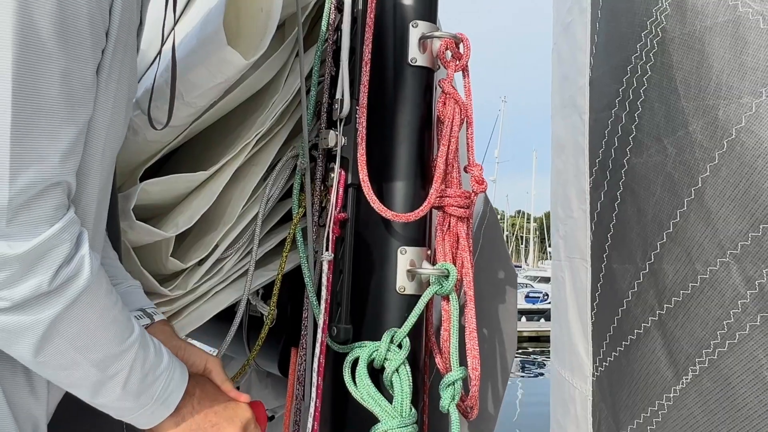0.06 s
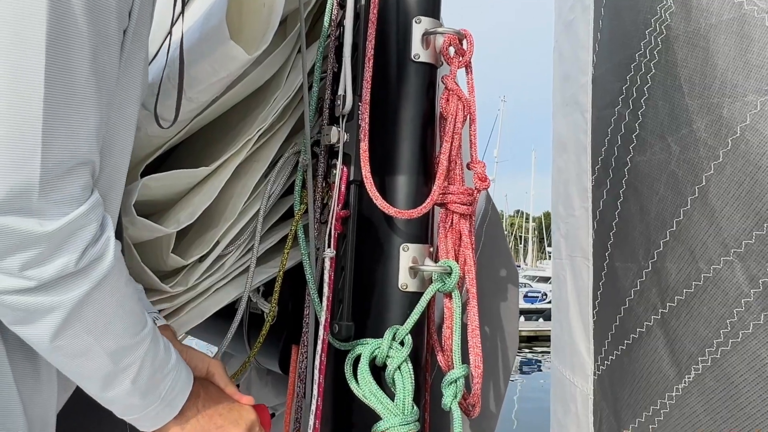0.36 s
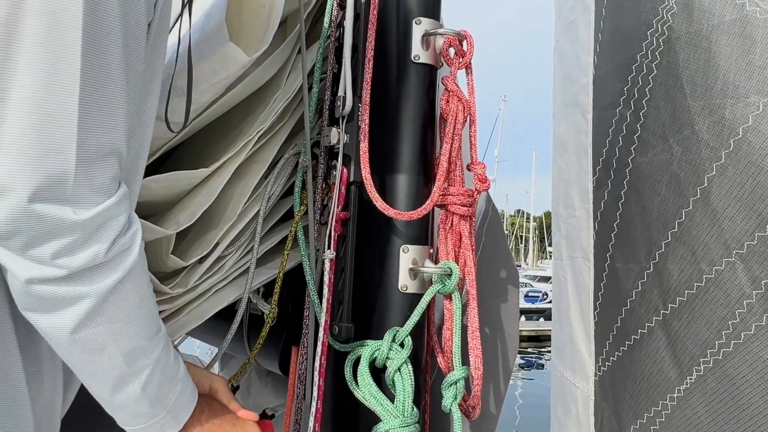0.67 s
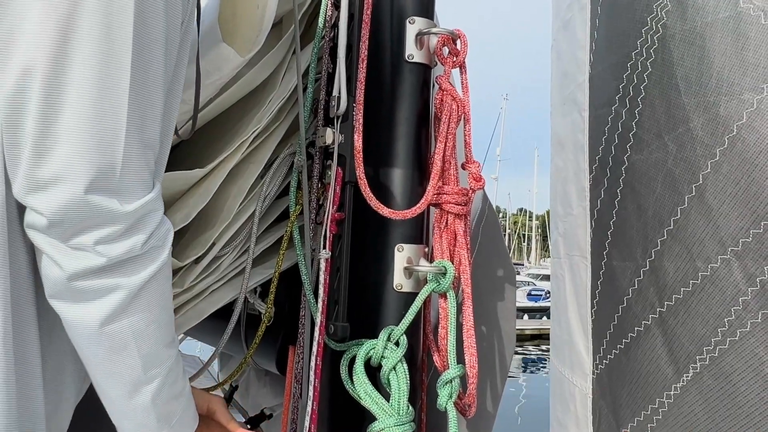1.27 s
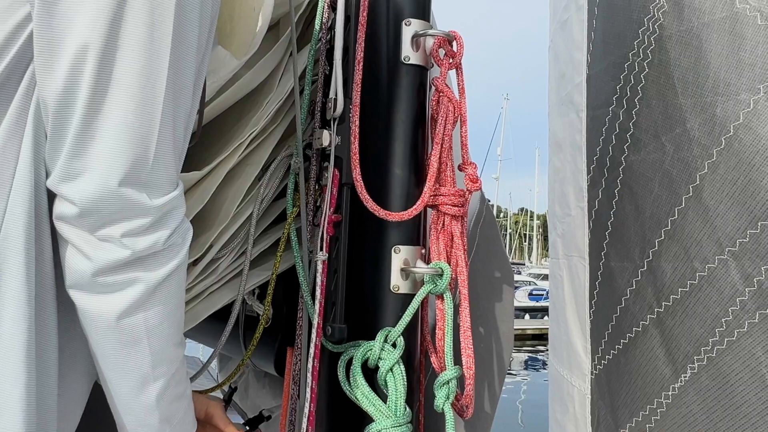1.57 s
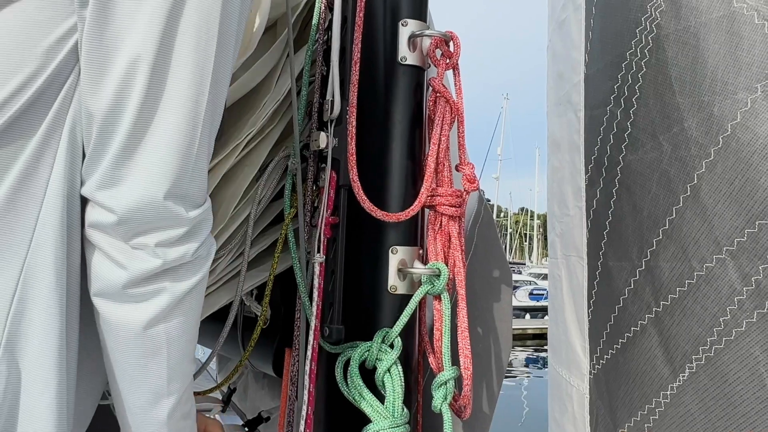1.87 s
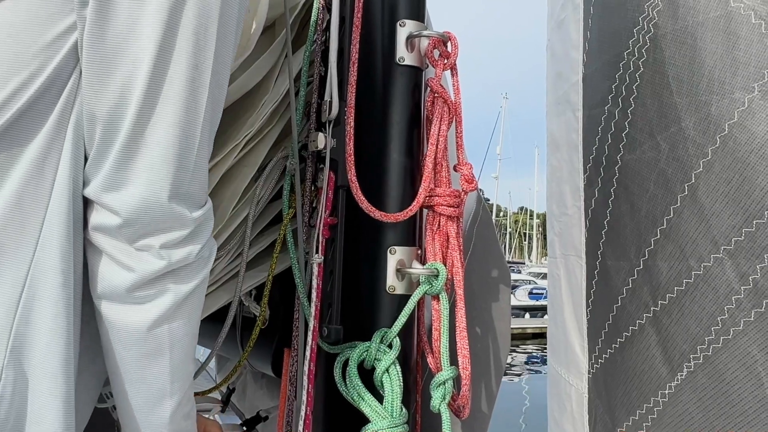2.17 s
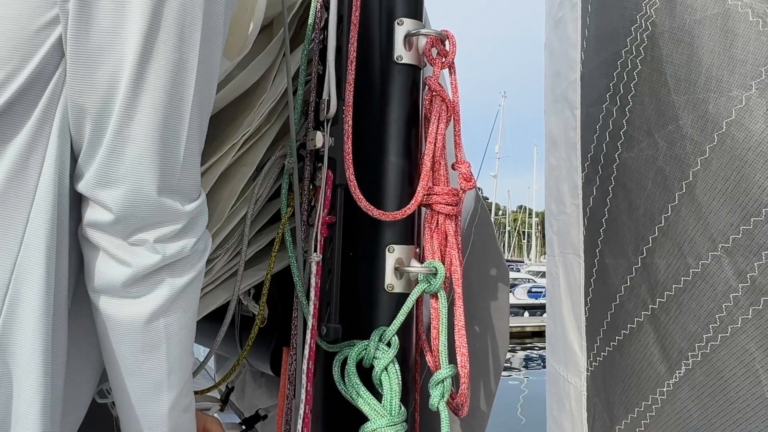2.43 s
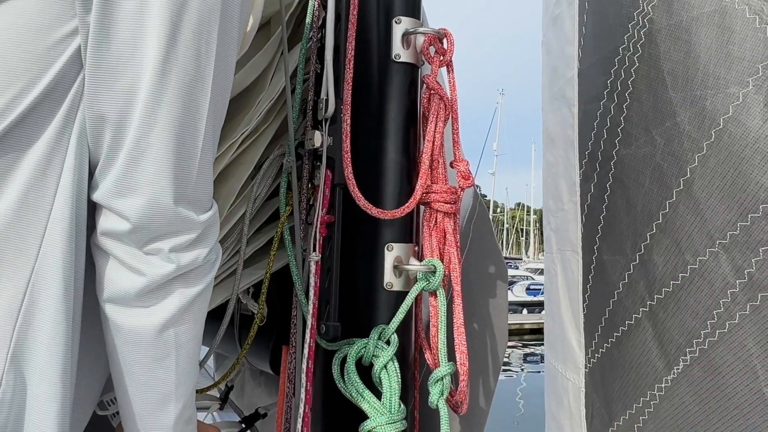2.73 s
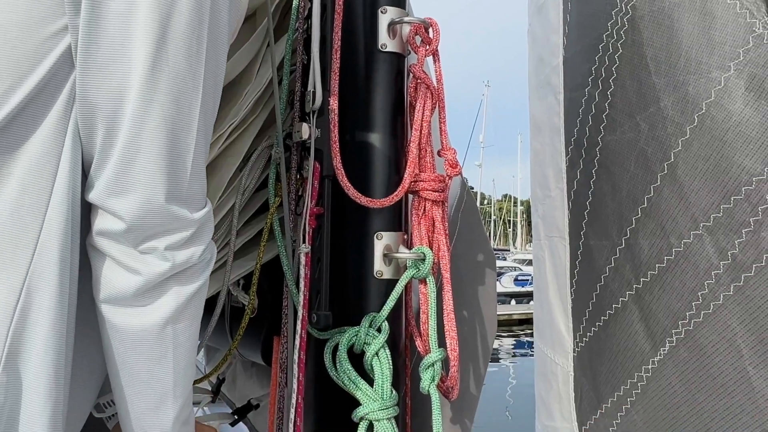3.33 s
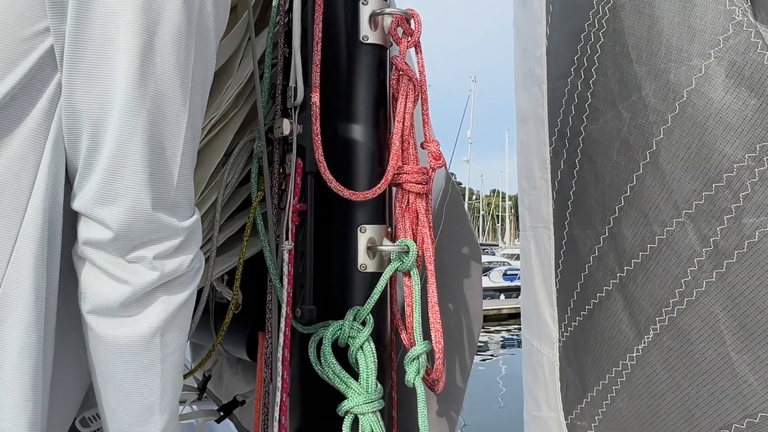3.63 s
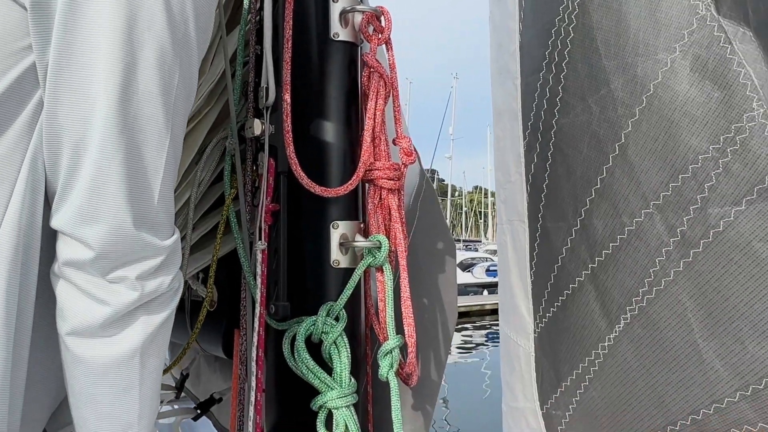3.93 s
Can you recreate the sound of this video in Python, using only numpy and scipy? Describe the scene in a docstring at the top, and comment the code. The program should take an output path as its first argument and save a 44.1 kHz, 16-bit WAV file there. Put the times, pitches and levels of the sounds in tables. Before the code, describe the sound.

Close up, a ratchet on a sailboat clicks at irregular intervals, each click with a brief metallic rattle. Fabric rustles midway, and the clicks break off and return. Behind them a boat engine idles and a distant bird whistles faintly.

```python
"""Sharp, dry clicks, many led by a soft take-up tick: a sailor ratchets hardware at the foot of a mast.
Each click is a crack and a short rattle that ring the fitting and scatter off deck and sail.
Sleeve and sailcloth rub as the arm moves; hand and rope knock softly. Behind them a boat engine
idles with a drone and exhaust puffs, a far bird whistles, and wind and water wash over the marina."""
import sys
import numpy as np
from scipy import signal
from scipy.fft import rfft, irfft
from scipy.io import wavfile
from scipy.ndimage import uniform_filter1d

SR = 44100
rng = np.random.default_rng(int(sys.argv[2]) if len(sys.argv) > 2 else 0)


def to_wav(sig):
    """Store sig (one row per channel, or 1-D mono) as 16-bit WAV at the path in sys.argv[1].

    Samples outside -1..1 are clipped; the rate is SR.
    """
    pcm = np.clip(np.atleast_2d(sig), -1, 1) * 32767
    pcm = np.round(pcm).astype(np.int16)
    wavfile.write(sys.argv[1], SR, pcm.T)  # frames by channels


N = 176400
T = np.arange(N) / SR
F = np.maximum(np.fft.rfftfreq(2 * N, 1 / SR), 1)
TOP_HZ = 15700


def undb(db):
    """Decibels to gain."""
    return 10 ** (np.asarray(db) / 20)


def unit(x):
    """Scale to rms 1."""
    return x / np.sqrt(np.mean(x ** 2))


def fade(t, t60_s):
    """Exponential decay, 60 dB down at t60_s."""
    return np.exp(-np.log(1000) * t / t60_s)


def over_hz(points):
    """Interpolate (freq_hz, value) points on a log-frequency axis."""
    hz, value = np.array(points, float).T
    return np.interp(np.log(F), np.log(hz), value)


def over_time(points):
    """Interpolate (time_s, value) points."""
    return np.interp(T, *np.array(points, float).T)


def filtered(x, response):
    """Apply a frequency response."""
    return irfft(rfft(x, 2 * N) * response)[..., :N]


def colour(points):
    """Minimum-phase response through (freq_hz, gain_db) points."""
    cepstrum = irfft(np.log(undb(over_hz(points))))
    return np.exp(rfft(np.r_[cepstrum[0], 2 * cepstrum[1:N], np.zeros(N)]))


def noise(points):
    """Two independent noises of one colour, rms 1."""
    return unit(filtered(rng.standard_normal((2, N)), colour(points)))


def walk(rate_hz):
    """Smooth random drift, rms 1."""
    hold = int(SR / rate_hz)
    steps = np.repeat(rng.standard_normal(N // hold + 1), hold)
    return unit(uniform_filter1d(uniform_filter1d(steps, hold), hold)[:N])


def resonance(x, hz, width_hz):
    """Band-pass with gain 1 at the centre."""
    return signal.lfilter(*signal.iirpeak(hz, hz / width_hz, fs=SR), x)


# freq_hz, gain_db
HARBOUR_SPECTRUM = [(20, -20.5), (100, 5.5), (180, 3.5), (250, -2.5), (330, -1), (450, -10), (700, -16),
                    (1200, -23), (2500, -30.5), (4000, -33), (8000, -53.5), (12000, -59), (15000, -66)]

def harbour(level_db=-42):
    """Distant wash of wind and water."""
    return noise(HARBOUR_SPECTRUM) * undb(level_db + 0.48 * walk(9))


# start_s, length_s, from_hz, to_hz, level_db
BIRD_NOTES = [(0.531, 0.086, 1620, 1710, -61), (0.68, .05, 1830, 2110, -64),
              (0.717, 0.074, 2650, 2675, -50.5), (0.906, 0.118, 1670, 1794, -59),
              (1.026, 0.079, 1770, 1830, -62), (1.248, 0.04, 2950, 2860, -53),
              (1.289, 0.031, 2670, 2670, -52.5), (1.834, 0.03, 2635, 2990, -55),
              (1.864, .058, 3020, 3110, -55)]

def bird(echo_db=-9.5, echo_t60_s=0.9):
    """Thin gliding whistles, blurred by their echo across the marina."""
    song = np.zeros(N)
    for start_s, length_s, from_hz, to_hz, level_db in BIRD_NOTES:
        progress = np.clip((T - start_s) / length_s, 0, 1)
        pitch_hz = (from_hz + (to_hz - from_hz) * progress) * (1 + 0.00763 * walk(160))
        envelope = np.sqrt(2 * np.abs(np.sin(np.pi * progress)))
        song += undb(level_db) * envelope * np.sin(2 * np.pi * np.cumsum(pitch_hz) / SR)
    tail = unit(rng.standard_normal((2, N)) * fade(T, echo_t60_s)) / np.sqrt(N)
    echo = undb(echo_db) * filtered(song, rfft(tail, 2 * N))
    return np.array([song, np.zeros(N)]) + echo


# cycle_multiple, level_db
ENGINE_ORDERS = [(1, -55.5), (2, -38.5), (3, -32.5), (4, -33.5), (5, -40.5), (6, -41), (7, -69), (8, -65.5),
                 (9, -55.5), (12, -56.5)]
# time_s, second_order_db, fourth_order_db
ORDER_SWELLS = [(0, 14, 10), (.2, -3, -0.5), (.45, 7.5, 8.5), (.68, -2, -4.5), (1.0, -1.5, -0.5),
                (1.18, 3.5, 7.5), (1.4, 6.5, -9.5), (1.68, 7, 0.5), (1.92, 7, -9), (2.17, 4, 7.5),
                (2.4, -23, -0.5), (2.58, -5, -16.5), (2.85, 3.5, 8), (3.1, -3, 5.5), (3.5, 2, 1),
                (3.75, -8, -9), (4, -9, -20)]
# freq_hz, gain_db
EXHAUST_SPECTRUM = [(20, -40), (45, -8.5), (75, 3.5), (110, 0), (170, -11.5), (250, -25), (400, -36),
                    (900, -59.5), (4000, -110)]
# time_s, gain_db
ENGINE_GAIN = [(0, 1), (.6, -1), (1.2, 0.5), (1.7, -4), (2.1, -8), (2.4, -4.5), (2.7, -3.5), (3.2, -1),
               (3.7, -5), (4, -4)]

def engine(cycle_hz=26.31, waver=0.00515, exhaust_db=-32.5, puff_depth=0.42):
    """An idling engine drones on swelling multiples of its cycle; the exhaust puffs once a cycle."""
    cycle_rad = 2 * np.pi * np.cumsum(cycle_hz * (1 + waver * walk(3.04))) / SR
    time_s, second_db, fourth_db = np.array(ORDER_SWELLS, float).T
    swell_db = {2: np.interp(T, time_s, second_db), 4: np.interp(T, time_s, fourth_db)}
    drone = np.zeros(N)
    for order, level_db in ENGINE_ORDERS:
        phase_rad = order * cycle_rad + 0.56 * walk(7) + 1.66 * rng.uniform(-1.16, 1)
        order_db = level_db + swell_db.get(order, 0) + 1.52 * walk(7.99)
        drone += np.sqrt(2) * undb(order_db) * np.cos(phase_rad)
    puffs = undb(exhaust_db) * noise(EXHAUST_SPECTRUM) * (1 + puff_depth * np.cos(cycle_rad))
    return (puffs + np.array([drone, np.zeros(N)])) * undb(over_time(ENGINE_GAIN))


# start_s, level_db, centre_hz, decay_s
ROPE_BUMPS = [(0.539, -41.5, 503, 0.02), (1.953, -35, 2100, 0.0053), (2.606, -42.5, 930, 0.012),
              (2.728, -49, 2600, 0.067), (2.99, -51.5, 3700, 0.023)]

def bumps(q=1.9):
    """Soft knocks and brushes of hand and rope: bursts of band-passed noise."""
    out = np.zeros((2, N))
    for start_s, level_db, centre_hz, decay_s in ROPE_BUMPS:
        band = 1 / (1 + 1j * q * (F / centre_hz - centre_hz / F)) ** 2
        thud = unit(filtered(rng.standard_normal((2, N)), band))
        age = np.maximum(T - start_s, 0) / decay_s
        out += undb(level_db) * thud * np.minimum(10 * age, 1) * np.exp(-age)
    return out


# time_s, level_db
ARM_RUB = [(0, -70), (.15, -57.5), (.3, -74.5), (.5, -66.5), (.57, -56), (.72, -63), (.86, -59),
           (.96, -72.5), (1.08, -70), (1.17, -51.5), (1.32, -52), (1.42, -47), (1.5, -42), (1.57, -46),
           (1.65, -50), (1.74, -46), (1.8, -53.5), (1.9, -50.5), (1.96, -43), (2.06, -44), (2.22, -47),
           (2.33, -50), (2.43, -50.5), (2.7, -51.5), (3.18, -58), (3.33, -53), (3.58, -50.5), (3.82, -54.5),
           (3.92, -48), (4, -45.5)]
# freq_hz, gain_db
CLOTH_SPECTRUM = [(200, -2.5), (600, 0), (1050, -3.5), (1350, -1), (1700, -7), (2600, 1.5), (3050, 0),
                  (3450, -4.5), (4200, -3.5), (4500, -2.5), (4900, -7.5), (5500, -3.5), (7200, -7.5),
                  (9700, -13), (11500, -12), (12600, -31), (15000, -71)]
# centre_hz
FOLD_BANDS = [800, 1600, 2700, 4500, 7000, 11000]

def cloth(gain_db=-2, flicker_db=1.5, flutter_db=1.92, catches_per_s=1100, fibre_db=-6.5, spread_db=3):
    """Fabric slides with a hiss; fibres catch and let go, and each fold flutters in its own band."""
    caught = rng.random(N) < catches_per_s / SR
    strength = undb(spread_db * np.minimum(rng.exponential(size=N), 4))
    catches = caught * strength * rng.standard_normal((2, N))
    rub = noise(CLOTH_SPECTRUM) + undb(fibre_db) * unit(filtered(catches, colour(CLOTH_SPECTRUM)))
    folds = np.zeros((2, N))
    for weights in np.eye(len(FOLD_BANDS)):
        band = over_hz(list(zip(FOLD_BANDS, weights)))
        folds += filtered(rub, band) * undb(flutter_db * walk(29.92))
    return folds * undb(gain_db + over_time(ARM_RUB) + flicker_db * walk(45))


def impact(t, treble_db, t60_s, crack_db=4.5, crack_s=0.00031, attack_s=0.0002,
           split_hz=4740, deck_db=-21.5, deck_t60_s=0.22, deck_hz=3650):
    """A crack and a rattle whose treble dies first, with dull reflections from deck and sail."""
    grit, scatter = rng.standard_normal((2, 2, len(t)))
    low = signal.filtfilt(*signal.butter(2, split_hz, fs=SR), grit)
    crack = undb(crack_db) * np.exp(-t / crack_s)
    body = low * np.hypot(fade(t, t60_s), crack / 2)
    treble = undb(treble_db) * (grit - low) * np.hypot(fade(t, 0.67 * t60_s), crack)
    deck = signal.lfilter(*signal.butter(1, deck_hz, fs=SR), scatter) * fade(t, deck_t60_s)
    return (body + treble + undb(deck_db) * deck) * (1 - np.exp(-t / attack_s))


# pitch_hz, width_hz, level_db
FITTING_MODES = [(816, 27, -5.5), (982, 71, -5.5), (1126, 55, 2), (1637, 150, 3), (1927, 123, 1.5),
                 (2430, 98, -3), (3490, 37, -7), (3980, 40, -0.5), (4610, 48, 3), (5296, 50, 1.5),
                 (8250, 520, -4), (11870, 1400, -2)]

def fitting(hit, contact_hz, contact_db=-0.5, ring_db=2.5):
    """The point of contact favours one pitch; the hit then rings the fitting's modes."""
    hit = hit + undb(contact_db) * resonance(hit, contact_hz, width_hz=340)
    return hit + sum(undb(ring_db + level_db) * resonance(hit, pitch_hz, width_hz)
                     for pitch_hz, width_hz, level_db in FITTING_MODES)


# start_s, level_db, treble_db, t60_s, contact_hz, cutoff_hz
RATCHET_CLICKS = [(0.0704, -25, 0.5, 0.059, 1760, 13400), (0.4096, -25, 0, 0.059, 2260, 16000),
                  (0.6193, -26, 2, 0.045, 1810, 14000), (0.7996, -27, 2, 0.041, 2120, 14500),
                  (0.8124, -31, 5, 0.053, 2620, 13500), (1.1199, -28, -2.5, 0.081, 1510, 14500),
                  (1.130, -29, 4.5, 0.031, 2030, 13000), (1.691, -26, 4, 0.037, 1600, 14000),
                  (1.6988, -27, 2.5, 0.049, 1980, 13000), (1.986, -25.5, 2, 0.047, 2120, 15500),
                  (2.144, -26, -2.5, 0.042, 2220, 12500), (3.252, -26, 1, 0.067, 2300, 13000),
                  (3.409, -26, 2.5, 0.058, 2360, 13500), (3.616, -27, 4, 0.057, 1620, 13600),
                  (3.776, -30.5, 2.5, 0.055, 2240, 13000), (3.779, -28, -2, 0.069, 1200, 12500),
                  (3.970, -25, 1.5, 0.023, 1520, 15500), (3.9758, -25, 0, 0.042, 1734, 13000)]
# start_s, level_db, treble_db
TAKE_UP_TICKS = [(0.0601, -36.5, -2), (0.399, -39, -1), (0.4072, -37, -12), (0.604, -43.5, 4),
                 (0.6106, -34.5, 5.5), (0.614, -37.5, 6), (0.7888, -41, 4.5), (1.1121, -37, -2),
                 (1.9525, -43.5, 5), (3.2394, -37, -0.5), (3.336, -43.5, 0.5), (3.4001, -39.5, 1),
                 (3.606, -38.5, -1), (3.7675, -35.5, -4), (3.963, -42, 2)]
# freq_hz, gain_db
RATTLE_SPECTRUM = [(150, -22), (450, 1.5), (900, 3), (1300, -0.5), (1600, -0.5), (2500, 3.5), (3300, 7.5),
                   (4500, 3.5), (6800, -0.5), (8500, 1), (12200, 3), (13200, 7), (15500, -5)]

def ratchet(tick_t60_s=0.081, tick_contact_hz=2530, tick_cutoff_hz=12000):
    """Parts strike the fitting: soft ticks as the slack is taken up, and sharp clicks."""
    t = T[:SR // 4]
    ticks = [(*tick, tick_t60_s, tick_contact_hz, tick_cutoff_hz) for tick in TAKE_UP_TICKS]
    out = np.zeros((2, N + len(t)))
    for start_s, level_db, treble_db, t60_s, contact_hz, cutoff_hz in RATCHET_CLICKS + ticks:
        click = fitting(impact(t, treble_db, t60_s), contact_hz)
        lowpass = signal.butter(2, min(cutoff_hz, TOP_HZ), fs=SR)
        onset = int(start_s * SR)
        out[:, onset:onset + len(t)] += undb(level_db) * signal.lfilter(*lowpass, click)
    return filtered(out, colour(RATTLE_SPECTRUM))


# freq_hz, coherence
NEAR_COHERENCE = [(300, 1), (700, 0.76), (1100, 0.85), (1700, 1), (2450, .96), (3000, 0.55), (5600, .25),
                  (6500, 0.9), (11500, 0.93), (13000, .995)]
WIDE_COHERENCE = [(60, .998), (130, .99), (300, .98), (580, .75), (950, .6), (1400, .78), (2500, .82),
                  (3400, .4), (4200, .2), (4850, .7), (5400, .15), (6200, .97), (7700, .97), (9300, .55),
                  (12000, .7)]
# freq_hz, left_over_right_db
BALANCE = [(40, 0), (75, .3), (120, 1), (200, 2.8), (330, 3.4), (650, 3.8), (1000, 2), (1600, .3),
           (3500, .3), (4700, -1.5), (7000, -.1)]
# freq_hz, lag_rad
LEFT_LAG = [(100, 0), (400, .2), (780, .95), (1350, .2), (2100, .2), (2700, .5), (3400, 2.9), (4800, 3.2),
            (5500, 6), (6100, 6.2), (7400, 6.35), (9000, 7.2), (11000, 8.2), (13000, 9.4)]

def stereo(pair, coherence_points):
    """Mix a mid/side pair to left and right, offset in level and phase."""
    coherence = np.clip(over_hz(coherence_points), 0, 1)
    mid, side = filtered(pair, np.sqrt([(1 + coherence) / 2, (1 - coherence) / 2]))
    lean = undb(over_hz(BALANCE) / 2) * np.exp(-0.5j * over_hz(LEFT_LAG))
    return filtered(np.array([mid + side, mid - side]), np.array([lean, 1 / lean]))


def scene():
    """Close ratchet in front of cloth, bumps, engine, harbour and bird."""
    near = stereo(ratchet(), NEAR_COHERENCE)
    surroundings = cloth() + bumps() + engine() + harbour() + bird()
    return near + stereo(surroundings, WIDE_COHERENCE)


def record(dry):
    """Steep low-pass at TOP_HZ."""
    return signal.sosfilt(signal.ellip(8, 0.2, 70, TOP_HZ, fs=SR, output="sos"), dry)


dry = scene()
out = record(dry)
to_wav(out)
```